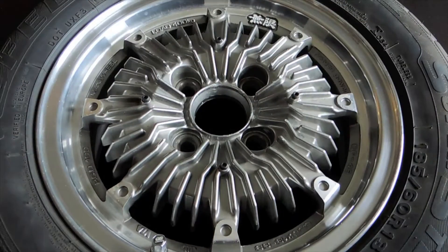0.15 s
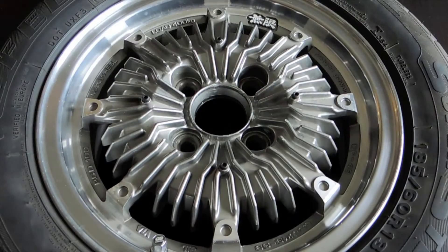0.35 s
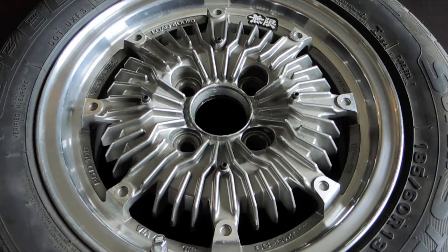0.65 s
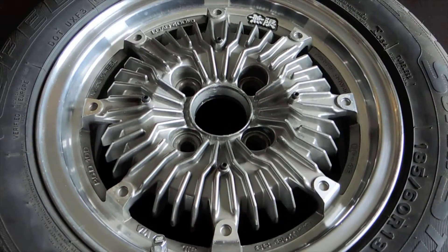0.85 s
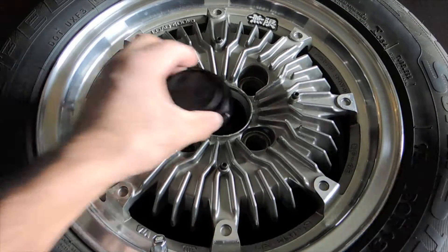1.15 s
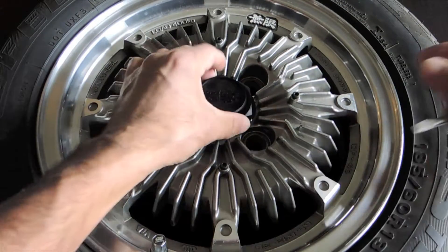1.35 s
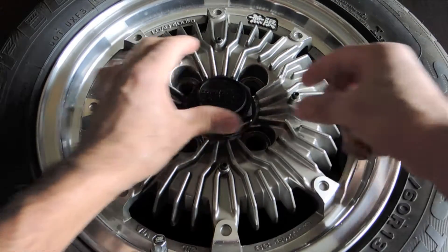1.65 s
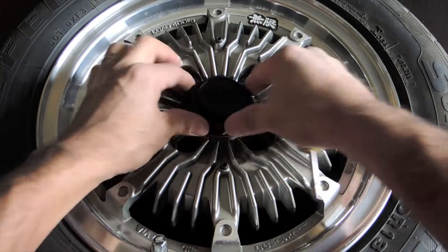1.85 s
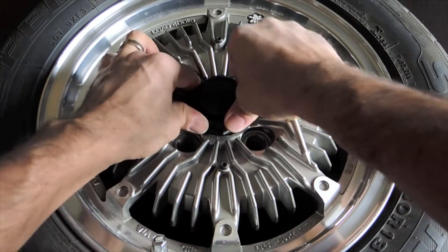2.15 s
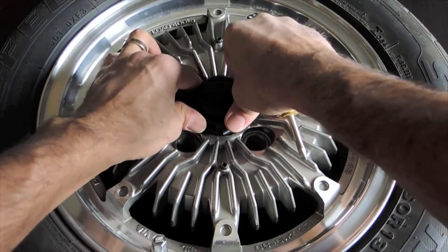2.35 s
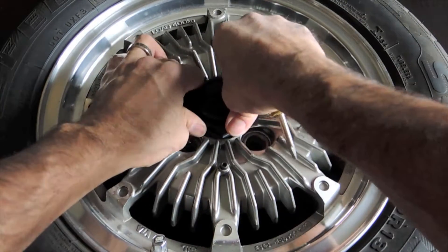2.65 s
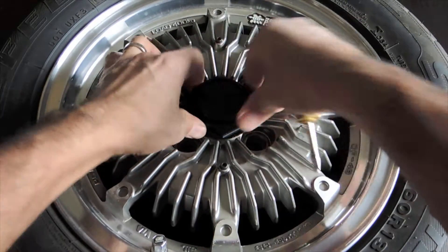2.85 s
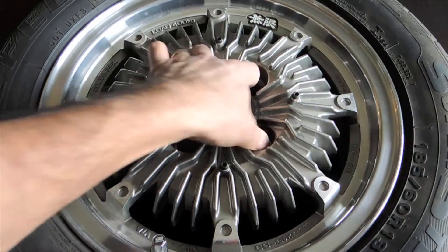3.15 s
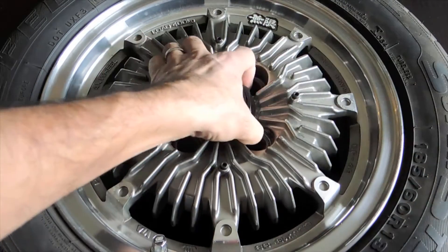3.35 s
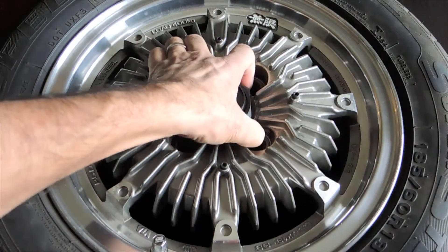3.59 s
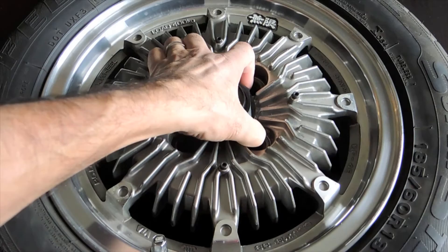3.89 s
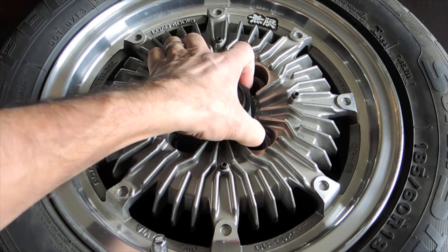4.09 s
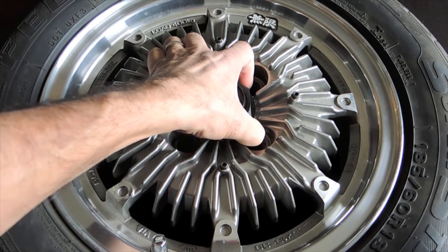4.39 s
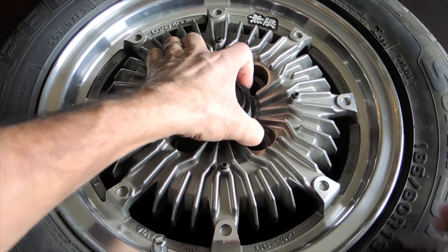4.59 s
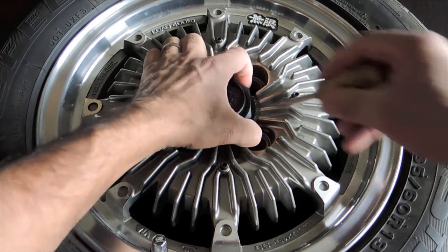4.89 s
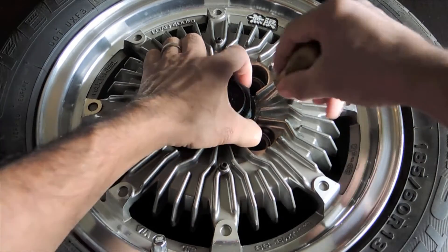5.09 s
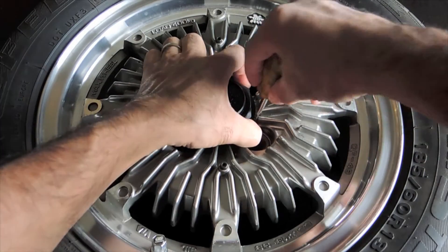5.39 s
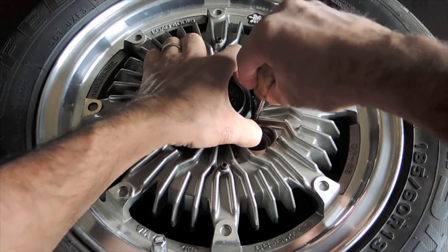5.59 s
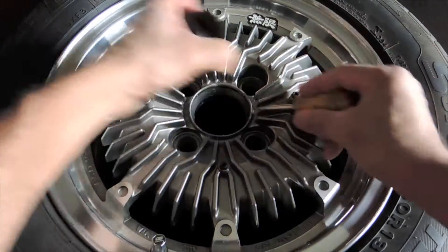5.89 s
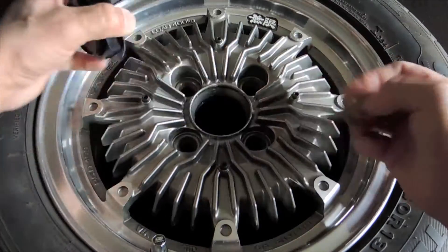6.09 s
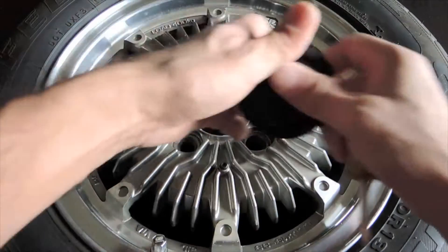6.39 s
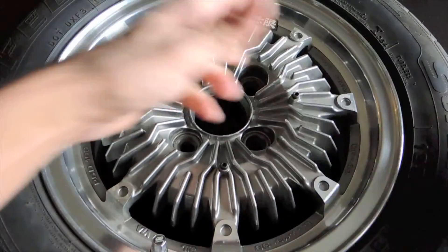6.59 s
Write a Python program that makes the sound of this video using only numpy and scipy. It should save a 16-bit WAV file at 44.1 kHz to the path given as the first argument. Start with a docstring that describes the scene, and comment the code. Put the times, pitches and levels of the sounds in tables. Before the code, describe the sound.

A small hard-walled garage with soft air noise and very faint motor hum; wheel and hands close, a box further off with dense short echo. From 0 to 0.3 s parts knock and shuffle in the box; from 0.5 to 0.9 s a plastic cap with a steel spring slides out in a quick run of scrapes and clinks. At 1.32 s it lands on the alloy wheel with a hollow double clack, a springy click following at 1.41. Faint bumps and rubbing come around 2 s, then a very loud, bright snap at 2.55 with a ringing metallic wash. Tiny taps near 3 s. Soft tool rocks from 3.9 to 4.6, then a short tumble and knocks at 4.7 to 4.9. Light alloy ticks at 5.2 to 5.4. At 5.92 a sharp plastic-and-spring pop frees the cap, with a small tap, then quiet skin brushes and cap rubbing until the end.

```python
"""Parts knock and shuffle in a box; a plastic cap with a steel spring ring slides out: slip noise through box colours.
The cap lands on an alloy wheel and snaps home: noise cracks plus decaying modes of alloy, hub, cap and spring.
A tool rocks and tumbles on the box, then a screwdriver prises the cap out and hands rub it and take it away.
A small hard-walled garage answers with dense echo over air noise and faint hum; peaks over full scale clip."""
import sys
import numpy as np
from scipy import signal
from scipy.fft import rfft, irfft, next_fast_len
from scipy.io import wavfile

SR = 44100
rng = np.random.default_rng(int(sys.argv[2]) if len(sys.argv) > 2 else 0)


def unload_wav(signal):
    """Save mono or channel-first audio to the path in sys.argv[1] as 16-bit WAV at rate SR, clipped to [-1, 1]."""
    wavfile.write(
        sys.argv[1],
        SR,
        np.round(np.clip(np.atleast_2d(signal).T, -1, 1) * 32767).astype(np.int16),
    )


N = 297234
TIME_S = np.arange(N) / SR
SIDES = np.array([[1], [-1]])  # left, right

# Mode and colour levels are relative: each sound is normalised before it is mixed.
# colours of parts moving in the box: f/Hz, level/dB
SHUFFLE = [(60, -32), (130, -5.5), (175, -11.5), (270, 0), (400, 1), (800, -9), (1500, -2), (1900, -2),
           (2800, -14), (4800, -22), (6000, -30), (9000, -30), (14000, -48)]
SLIDE = [(80, -33), (130, -19), (210, -24), (290, -5.5), (350, -16.5), (600, -10.5), (1200, -6.5),
         (1600, -2), (1900, 3), (2200, -13), (3200, -16), (5000, -30.5), (9000, -33.5), (14000, -48)]
TUMBLE = [(80, -24), (170, -14.5), (250, -2), (310, -17.5), (380, 5), (470, -12.5), (660, -5.5), (780, -10),
          (1600, -7), (2100, -12.5), (2700, -21), (4200, -26.5), (5300, -37.5), (14000, -46)]
# motion name: colour above, slip rate/(1/s), slip spread/dB, metal ring/dB, rattle/dB, release t60/s
MOTIONS = {"shuffle": (SHUFFLE, 650, 0, -24.5, -13.5, 0.46), "slide": (SLIDE, 700, 5.4, -10, -1.5, .17),
           "tumble": (TUMBLE, 740, 0.68, -43.5, -12, 0.086)}
# shoves that drag the parts: t/s, hold/s, level/dB, weight on box floor/dB, motion name
SHOVES = [(0, 0.014, -14, -11, "shuffle"), (0.116, .03, -19.5, 2.5, "shuffle"),
          (0.22, .01, -15.5, 1.5, "shuffle"), (0.551, 0.049, -21, 12.5, "slide"),
          (0.648, .04, -16.5, 5, "slide"), (0.727, .04, -16.5, 1, "slide"),
          (0.823, .008, -23, -13.5, "slide"), (4.7, .015, -52.5, 14, "tumble"),
          (4.724, .065, -37, 8.5, "tumble"), (4.823, 0.0071, -17.5, -3.5, "tumble"),
          (4.846, .025, -15.5, -8, "tumble"), (4.898, 0.038, -33, 4, "tumble")]
# parts knocking together: t/s, strength/dB, landing name
KNOCKS = [(.015, -21.5, "metal"), (.094, -35, "edge"), (.111, -19.5, "floor"), (0.131, -29.5, "edge"),
          (.226, -20, "floor"), (0.508, -42, "edge"), (0.538, -28.5, "metal"), (0.5602, -21.5, "metal"),
          (0.6149, -28.5, "metal"), (0.633, -22, "metal"), (0.6494, -15, "metal"), (.659, -23.5, "metal"),
          (.668, -16.5, "floor"), (0.7122, -21, "metal"), (0.7619, -17.5, "metal"), (0.819, -14, "metal"),
          (0.8497, -21.5, "metal"), (4.7067, -47, "metal"), (4.733, -39, "metal"), (4.8006, -31.5, "metal"),
          (4.8184, -19.5, "metal")]
# landing name: box knock/dB, clink/dB, tick/dB
LANDINGS = {"floor": (0, -9, -17.5), "metal": (-4.1, 0, -11), "edge": (-4.5, -8.5, 0)}
# modes of small hard parts: f/Hz, level/dB, t60/s
CLINK_MODES = [(1687, 2, .03), (1815, 0, .025), (1930, 1, .025), (2520, -9.5, .02), (4150, -13.5, .02)]
# colour of the crowded modes of loose metal parts: f/Hz, level/dB
METAL_COLOUR = [(400, -36), (1300, -18), (1800, 1), (2000, -11), (2250, -7.5), (3500, -14.5), (4100, -13.5),
                (4700, -21), (12000, -42)]
# colour of a small contact tick: f/Hz, level/dB
TICK_COLOUR = [(200, -17), (1400, 5), (2600, 8.5), (5500, -1), (7500, -3), (9200, -2.5), (11000, -14.5),
               (14000, -15.5)]
# tool rocking on the box: t/s, strength/dB
ROCKS = [(3.92, -53), (4.104, -40), (4.279, -48), (4.433, -46), (4.594, -47.5)]
# box modes: f/Hz, level/dB, t60/s
BOX_MODES = [(132.4, 1, .16), (156, -12.5, 0.099), (257, -5, 0.25), (388.3, -8.5, 0.31), (490, -13, 0.25),
             (667, -13, 0.13), (932, -14, 0.16)]
# colour of the scuff of a rock on the box: f/Hz, level/dB
SCUFF_COLOUR = [(70, -30), (130, 1), (400, -4), (900, -13), (1800, -18), (4000, -56), (12000, -86)]

# garage echo: f/Hz, t60/s, relative level/dB
GARAGE_ECHO = [(120, .5, -3.5), (297.2, 0.5, -3.5), (700, 0.42, 1.5), (1840, 0.48, -2.5),
               (4390, 0.45, -0.5), (8050, 0.38, -1), (12980, 0.094, 5)]
# diffuse sound at the two microphone ports: f/Hz, side-mid/dB
PORT_WIDTH = [(30, -2), (200, -16), (500, -9), (1000, -9.5), (2000, -6), (4000, -1.5), (9000, -1)]
# direct sound at the ports: f/Hz, left-right/dB
PORT_SHADE = [(100, 2), (500, 1.5), (1200, 1.5), (4000, -4.5), (8000, -11), (12000, 2.5)]
# colour of still air: f/Hz, relative density/dB per Hz
AIR_COLOUR = [(15, -54), (25, -26.5), (63, -4), (87, -24.5), (122, -6.5), (219, -13), (335, -11),
              (425, -16), (539, -10), (703, -20), (802, -13), (1730, -22.5), (3100, -19.5), (4990, -24.5),
              (14000, -24.5)]
# distant motor: f/Hz, rms level/dB
MOTOR_HUM = [(59.2, -74), (118.4, -63), (3079, -74.5)]

# fingers rubbing the cap: t/s, hold/s, level/dB
RUBS = [(1.959, .006, -37.5), (2.05, .19, -53.5), (6.449, 0.1, -40.5), (6.574, 0.17, -51.5)]
# colour of the rubbed cap: f/Hz, level/dB
RUB_COLOUR = [(80, -14.5), (290, -1), (480, -1), (650, -2.5), (1050, -14), (1400, -6), (2000, -12),
              (3000, -14), (3600, -28), (4600, -7.5), (5700, -28), (14000, -27.5)]
# skin over skin: t/s, hold/s, level/dB
BRUSHES = [(1.251, 0.0047, -51), (1.955, 0.0089, -56), (2.958, 0.021, -50), (3.307, .01, -56),
           (6.256, 0.025, -45), (6.374, 0.083, -51), (6.53, 0.23, -59)]
# colour of brushed skin: f/Hz, level/dB
SKIN_COLOUR = [(200, -22.5), (2500, -6), (6000, -4.5), (9500, 2.5), (13000, -4.5), (14500, -5)]

# blows on cap and wheel: t/s, strength/dB, contact name, left-right/dB
BLOWS = [(1.3222, -16.5, "landing", 5), (1.3323, -11, "landing", -3.5), (1.35, -20.5, "cap edge", 2),
         (1.376, -23.5, "landing", 0), (1.4132, -12.5, "spring", -1.5), (1.4317, -29.5, "bump", 0.5),
         (1.959, -44.5, "bump", 1.5), (1.9778, -40.5, "bump", 2.5), (1.9846, -35, "squeeze", -1),
         (2.007, -57, "squeeze", 5), (2.0502, -51, "tick", 2), (2.5476, -11, "snap", 2.5),
         (2.552, -20, "snap", -8), (2.9159, -43.5, "tick", 0), (3.187, -43.5, "alloy", 0.5),
         (3.247, -48.5, "bump", -1), (3.67, -70.5, "cap edge", 3), (5.2188, -32, "alloy", 2),
         (5.3037, -36.5, "alloy", -3.5), (5.4415, -50.5, "alloy", 1), (5.9222, -9.5, "prise", -1.5),
         (5.9265, -22, "prise", -1), (5.985, -30.5, "cap edge", 0), (6.233, -53, "graze", 3),
         (6.3335, -54, "bump", 2.5), (6.386, -55, "graze", 3), (6.417, -50.5, "graze", 4),
         (6.447, -43, "bump", 0.5), (6.5434, -60, "squeeze", 10)]
# contact name: wheel ring/dB, cap ring/dB, spring ring/dB, hub thud/dB, crack/dB, pitch of fifth spring mode/Hz
CONTACTS = {"landing": (-3, 0, -27.5, -18.5, -20.5, 7196), "cap edge": (-15.5, 6, -6, -12.5, -3, 6988.5),
            "spring": (-12, -11, 0, -42, -7.5, 7651), "bump": (-2.5, -3.5, -11.5, 1.5, -7, 7652.5),
            "squeeze": (2.5, -12, 0, -3.5, -1.5, 6237), "snap": (1, -30, -5, -17.5, 5.5, 7681.5),
            "alloy": (-0.5, -13, -15, -14, -8.5, 7110), "tick": (-27, -16, -11, -16, -0.5, 6798.5),
            "prise": (-20, -1.5, -2, -6.5, 0.5, 7693), "graze": (-31, 2, -4.5, -8, -6, 7602)}
# alloy wheel modes: f/Hz, level/dB, t60/s
WHEEL_MODES = [(1112, 1.5, 0.065), (1200, -2.5, .1), (1270, 4.5, 0.041), (1466, 3.5, 0.032),
               (1590, -12, 0.097), (1790, -11.5, 0.025), (2210, -13.5, .08), (2400, -16, .04),
               (3480, -25, .05), (4180, -11.5, .06)]
# plastic cap modes: f/Hz, level/dB, t60/s
CAP_MODES = [(1515, -4, 0.037), (1967, 3.5, 0.046), (2600, -16, .02), (3400, -12.5, .02), (2208, 2, 0.095),
             (2246, 1.5, 0.15), (2346, -9, .08), (3006, -7.5, 0.093), (3110, -5, 0.097), (4386, -11, 0.11),
             (4700, -7.5, 0.044), (5800, -15.5, 0.037)]
# steel spring modes, shifted together to the contact's pitch: unshifted f/Hz, level/dB, t60/s
SPRING_MODES = [(6040, -9, .04), (6330, -8.5, 0.076), (6880, -3.5, 0.053), (7420, 0, .05),
                (7820, 5.5, 0.05), (7960, -5, 0.025), (8560, -7, 0.057)]
# hollow hub modes: f/Hz, level/dB, t60/s
HUB_MODES = [(246.3, -10, 0.11), (293, -3, 0.093), (376, 1, 0.046), (449.4, -5.5, 0.038),
             (563, -1.5, 0.034), (636, -14, 0.048)]
# colour of the contact crack: f/Hz, level/dB
CRACK_COLOUR = [(20, -41), (100, -22), (500, 2.5), (900, -6.5), (1400, 7.5), (2600, -5), (4000, 1.5),
                (5500, -6.5), (9000, -3), (11000, -12.5), (14000, -10)]
# jolts that shake the whole wheel: t/s, barrel wash/dB, tyre boom/dB, air cavity/dB
JOLTS = [(1.3332, -31, -48, -40.5), (2.5468, -11, -26, -27), (3.186, -75, -46, -53),
         (5.9224, -27.5, -29, -26)]
# colour of the crowded alloy barrel modes: f/Hz, level/dB
BARREL_COLOUR = [(300, -21), (560, -13.5), (980, -22.5), (1110, 3), (1330, -3), (1460, 0.5), (1650, -4.5),
                 (2070, 3.5), (2400, -19), (3300, -9), (3950, -7.5), (4300, -8.5), (4900, -20.5),
                 (8800, -13.5), (14000, -30.5)]
# tyre modes: f/Hz, level/dB, t60/s
TYRE_MODES = [(116.6, 4.5, 0.25), (126, -9.5, 0.064)]
# colour of the tyre shifting on the floor: f/Hz, level/dB
TYRE_RUMBLE_COLOUR = [(25, 0.5), (70, -6.5), (120, -1), (200, -10.5), (600, -29.5), (4000, -62.5)]
# air cavity modes: f/Hz, level/dB, t60/s
CAVITY_MODES = [(266.2, 0.39, 0.41), (276, -1.4, .12)]


def amp(db):
    """Decibels to gain."""
    return 10 ** (np.asarray(db) / 20)


def decay(t_s, t60_s):
    """Exponential fall of 60 dB per t60."""
    return np.exp(-np.log(1000) * t_s / t60_s)


def along(points, size):
    """Columns of a table over frequency, interpolated at the bins of a transform."""
    hz, *columns = np.transpose(points)
    log_bins = np.log(np.fft.rfftfreq(size, 1 / SR) + 1)
    return [np.interp(log_bins, np.log(hz), column) for column in columns]


def tint(x, colour):
    """Zero-phase filter by an (f/Hz, level/dB) curve."""
    size = next_fast_len(x.shape[-1])
    gain = amp(along(colour, size)[0])
    return irfft(rfft(x, size) * gain, size)[..., :x.shape[-1]]


def unit(x):
    """Scale to unit energy."""
    return x / np.sqrt(np.sum(x ** 2))


def blow(x):
    """Scale a response to unit mean power over its first 20 ms."""
    return x / np.sqrt(np.mean(x[:SR // 50] ** 2))


def body(colour, size=2048):
    """Causal minimum-phase response of a heavily damped object with this colour."""
    cepstrum = irfft(np.log(amp(along(colour, size)[0])))
    cepstrum[1:size // 2] *= 2
    cepstrum[size // 2 + 1:] = 0
    return unit(irfft(np.exp(rfft(cepstrum))))


def through(x, response):
    """Convolve a sound with a response, keeping its length."""
    return signal.fftconvolve(x, response)[:len(x)]


def add(track, t_s, x):
    """Mix a sound in at a time."""
    start = max(int(t_s * SR), 0)
    track[..., start:start + x.shape[-1]] += x[..., :N - start]


def ring(modes, scatter_db, rise_s, detune=.004, stretch=1, size=22050):
    """Decaying modes; grip and contact point shift and feed them a little differently each time."""
    hz, db, t60_s = np.transpose(modes)[:, :, None]
    t_s = TIME_S[:size]
    hz = hz * stretch * (1 + detune * rng.standard_normal(hz.shape))
    polarity = rng.choice([-1, 1], hz.shape)
    gain = amp(db + scatter_db * rng.standard_normal(hz.shape)) * polarity
    waves = np.sin((2 * np.pi * hz * t_s).astype(np.float32))
    fade = np.exp(-np.minimum(np.log(1000) * t_s / t60_s, 20).astype(np.float32))
    rise = 1 - np.exp(-t_s / rise_s)
    return blow((gain * waves * fade).sum(0) * rise)


def burst(colour, t60_s, size=22050):
    """Coloured noise that dies away: a contact, or modes too crowded to tell apart."""
    noise = through(rng.standard_normal(size), body(colour))
    return noise * blow(decay(TIME_S[:size], t60_s))


def grit(rate_per_s, spread_db):
    """Tiny slips of uneven size and random sign at random moments, unit power."""
    moments = rng.random(N) < rate_per_s / SR
    sizes = amp(spread_db * np.minimum(rng.exponential(size=N), 3))
    slips = moments * rng.choice([-1, 1], N) * sizes
    return slips / slips.std()


def stroke(t_s, hold_s, attack_s, release_s):
    """One hand movement: swells up to its time, holds, then falls 60 dB per release, to -120 dB."""
    rise = np.clip(1 + (TIME_S - t_s) / attack_s, 0, 1) ** 2
    return rise * decay(np.clip((TIME_S - t_s - hold_s) / release_s, 0, 2), 1)


def strokes(table, attack_s, release_s):
    """Summed envelope of a table of hand movements."""
    return sum(amp(db) * stroke(t_s, hold_s, attack_s, release_s) for t_s, hold_s, db in table)


def diffuse(size):
    """Wide noise: most alike at both ports near 200 Hz, less so in the deepest bass and the treble."""
    side_gain = amp(along(PORT_WIDTH, size)[0])
    mid, side = rfft(rng.standard_normal((2, size)))
    return irfft((mid + SIDES * side_gain * side) / np.sqrt(1 + side_gain ** 2), size)


def drag(motion):
    """Parts slip over the box floor, rattle, knock on it and ring on; weight sets the box's bass."""
    colour, rate_per_s, spread_db, metal_db, rattle_db, release_s = MOTIONS[motion]
    shoves = [row[:-1] for row in SHOVES if row[-1] == motion]
    efforts = [amp(db) * stroke(t_s, hold_s, attack_s=.027, release_s=release_s) for t_s, hold_s, db, _ in shoves]
    effort = np.max(efforts, axis=0)
    # the strongest shove at each moment sets the weight
    weight = amp([weight_db for *_, weight_db in shoves])[np.argmax(efforts, axis=0)]
    slips = grit(rate_per_s, spread_db) * effort
    for t_s, db, landing in KNOCKS:
        # a knock excites the box in the motion of its nearest shove
        nearest = min(SHOVES, key=lambda shove: abs(shove[0] - t_s))
        if nearest[-1] == motion:
            knock_db = LANDINGS[landing][0]
            add(slips, t_s, amp(db + knock_db) * blow(signal.unit_impulse(SR // 10)))
    bass = signal.sosfilt(signal.butter(1, 450, fs=SR, output="sos"), slips)
    box = through(slips + bass * (weight - 1), body(colour))
    lesser_knocks = grit(rate_per_s=40, spread_db=5.5) * effort
    rattle = through(lesser_knocks, unit(ring(CLINK_MODES, scatter_db=2.5, rise_s=.0003, size=4096)))
    metal = through(slips, unit(burst(METAL_COLOUR, t60_s=.59)))
    return box + amp(rattle_db) * rattle + amp(metal_db) * metal


def parts_box():
    """Dragged parts, the clink modes and tick noise of each knock, and box modes under a rocking tool."""
    out = sum(drag(motion) for motion in MOTIONS)
    for t_s, db, landing in KNOCKS:
        _, clink_db, tick_db = LANDINGS[landing]
        clink = ring(CLINK_MODES, scatter_db=2.5, rise_s=.0003, detune=.015, size=4096)
        tick = burst(TICK_COLOUR, t60_s=.053, size=4096)
        add(out, t_s, amp(db + clink_db) * clink + amp(db + tick_db) * tick)
    for t_s, db in ROCKS:
        boom = ring(BOX_MODES, scatter_db=.5, rise_s=.031, detune=.0038)
        scuff = amp(2) * burst(SCUFF_COLOUR, t60_s=.25)  # 2 dB over the boom
        add(out, t_s, amp(db) * (boom + scuff))
    return out


def garage(x, wet_db, size=32768):
    """Direct sound and a dense echo that builds up quickly and dies first in the treble."""
    hz, t60s_s, levels_db = np.transpose(GARAGE_ECHO)
    t_s, noise = TIME_S[:size], rfft(diffuse(size))
    build_up = 1 - np.exp(-(t_s / .0034) ** 2)
    tail = 0
    for share, t60_s, band_db in zip(np.eye(len(hz)), t60s_s, levels_db):
        band = irfft(noise * along(np.c_[hz, share], size)[0])
        tail = tail + amp(band_db) * band * unit(decay(t_s, t60_s) * build_up)
    shade = np.array(PORT_SHADE)
    direct = np.array([tint(x[k], shade * [1, side / 2]) for k, side in enumerate((1, -1))])
    echo = np.array([through(x[k], tail[k]) for k in range(2)])
    return direct + amp(wet_db) * echo


def background():
    """Still air as diffuse noise, a little louder on the left, and sine tones of a faint motor hum."""
    air = tint(diffuse(N), AIR_COLOUR)
    air = air / air.std() * amp(-52.5 + .53 * SIDES)
    hum = 0
    for hz, db in MOTOR_HUM:
        phase_rad = rng.uniform(0, 2 * np.pi)
        hum = hum + amp(db) * np.sqrt(2) * np.sin(2 * np.pi * hz * TIME_S + phase_rad)
    return air + hum


def hands():
    """Fingers rub the hollow cap and brush over each other: random slips through cap and skin colours."""
    rub = strokes(RUBS, attack_s=.015, release_s=.16)
    brush = strokes(BRUSHES, attack_s=.03, release_s=.15)
    cap_noise = through(grit(2500, spread_db=-.5), body(RUB_COLOUR))
    skin_noise = through(grit(7600, spread_db=4.5), body(SKIN_COLOUR))
    return rub * cap_noise + brush * skin_noise


def cap_blow(db, contact, pan_db):
    """One contact cracks and rings the alloy, the cap, its spring and the hollow hub."""
    wheel_db, cap_db, spring_db, thud_db, crack_db, spring_hz = CONTACTS[contact]
    # the alloy rings only briefly under the hands
    hit = amp(wheel_db) * ring(WHEEL_MODES, scatter_db=4.5, rise_s=.0003)
    # the cap chatters against its seat, which roughens its ring
    chatter = 1 + .55 * through(rng.standard_normal(len(hit)), unit(np.hanning(130)))
    hit += amp(cap_db) * blow(chatter * ring(CAP_MODES, scatter_db=1.5, rise_s=.00027, detune=.006))
    hit += amp(thud_db) * ring(HUB_MODES, scatter_db=2, rise_s=.001, detune=.015)
    # a harder blow rattles for longer
    hit += amp(crack_db) * burst(CRACK_COLOUR, t60_s=.0067 + .044 * amp((db + crack_db) / 2))
    # the squeeze sets the spring's pitch; it chatters with the cap and reaches each port differently
    stretch = spring_hz / SPRING_MODES[4][0]
    spring = np.array([
        blow(chatter * ring(SPRING_MODES, scatter_db=1.2, rise_s=.0002, detune=.002, stretch=stretch))
        for _ in range(2)])
    return (hit + amp(spring_db) * spring) * amp(db + SIDES * pan_db / 2)


def wheel_jolt(barrel_db, boom_db, cavity_db):
    """A jolt shakes the alloy barrel, the tyre and the air cavity."""
    # the barrel radiates from all round its rim, so the two ports hear it differently
    mid, side = (burst(BARREL_COLOUR, t60_s=.56, size=32768) for _ in range(2))
    out = amp(barrel_db) * (mid + amp(-17.5) * SIDES * side)
    tyre = ring(TYRE_MODES, scatter_db=.5, rise_s=.002035)
    tyre += amp(-3) * burst(TYRE_RUMBLE_COLOUR, t60_s=.1)
    add(out, 0, amp(boom_db) * tyre)
    add(out, 0, amp(cavity_db) * ring(CAVITY_MODES, scatter_db=1.5, rise_s=.00077))
    return out


def cap_on_wheel():
    """Blows excite cap and wheel at the contact; jolts reach barrel and tyre."""
    out = np.zeros((2, N))
    for t_s, db, contact, pan_db in BLOWS:
        add(out, t_s, cap_blow(db, contact, pan_db))
    for t_s, *levels_db in JOLTS:
        add(out, t_s, wheel_jolt(*levels_db))
    return out


def scene():
    """Wheel and hands are close; the box stands further off, with more echo."""
    far = garage(np.tile(parts_box(), (2, 1)), wet_db=0)
    near = garage(cap_on_wheel() + hands(), wet_db=-6.5)
    return near + far + background()


def record(dry):
    """The sound is clipped at full scale, then low-passed at 14150 Hz."""
    lowpass = signal.ellip(8, .2, 60, 14150, fs=SR, output="sos")
    return signal.sosfilt(lowpass, np.clip(dry, -1, 1))


dry = scene()
out = record(dry)
unload_wav(out)
```